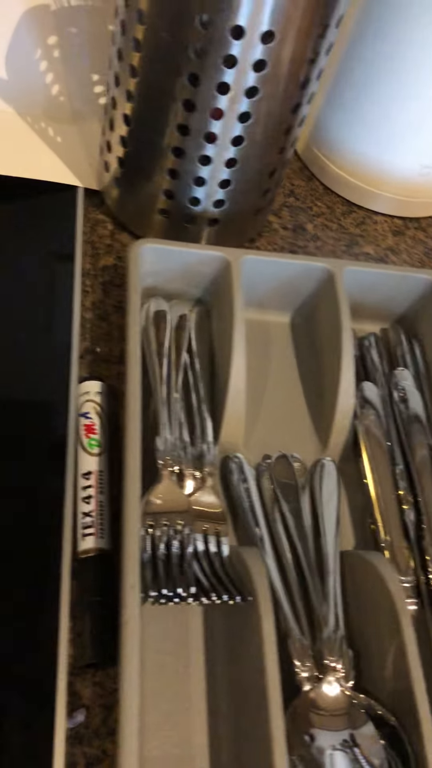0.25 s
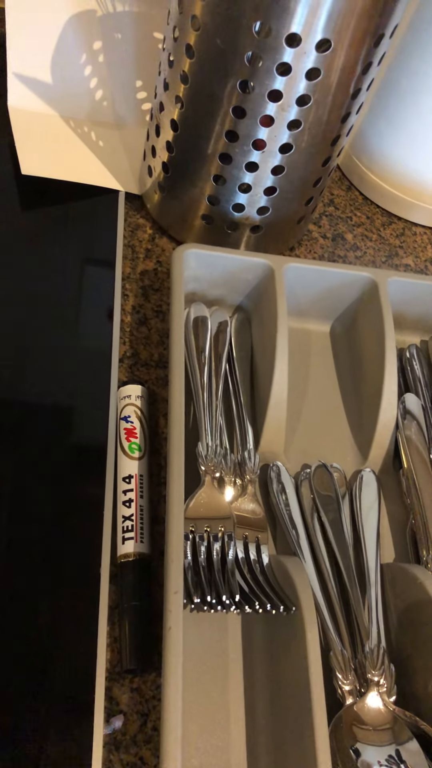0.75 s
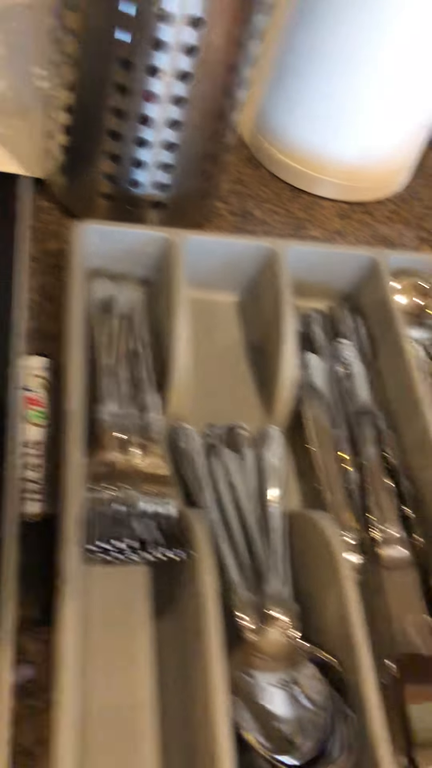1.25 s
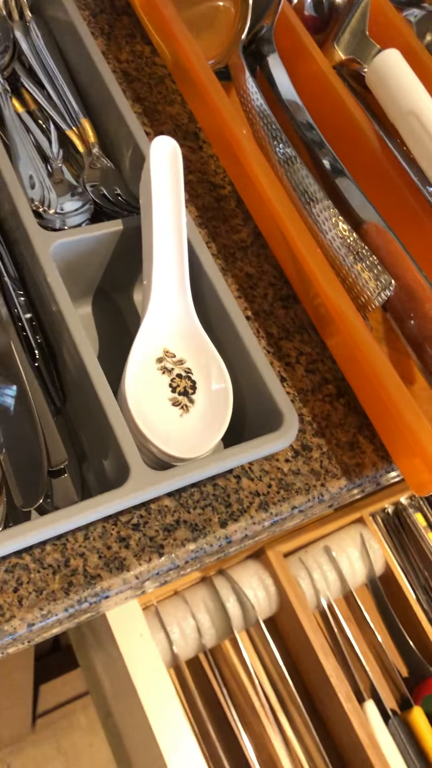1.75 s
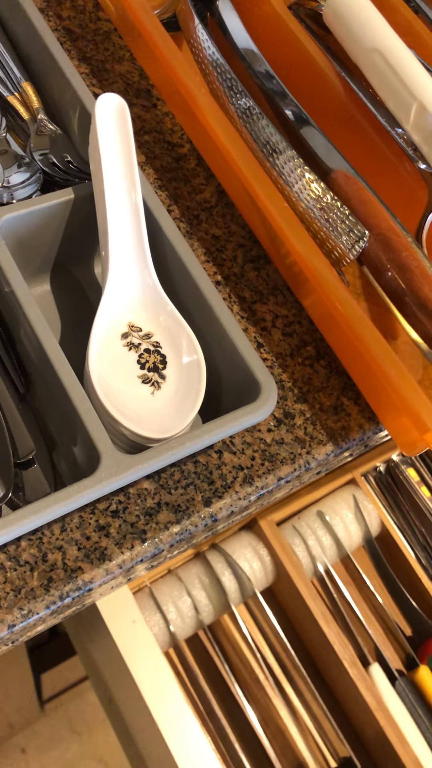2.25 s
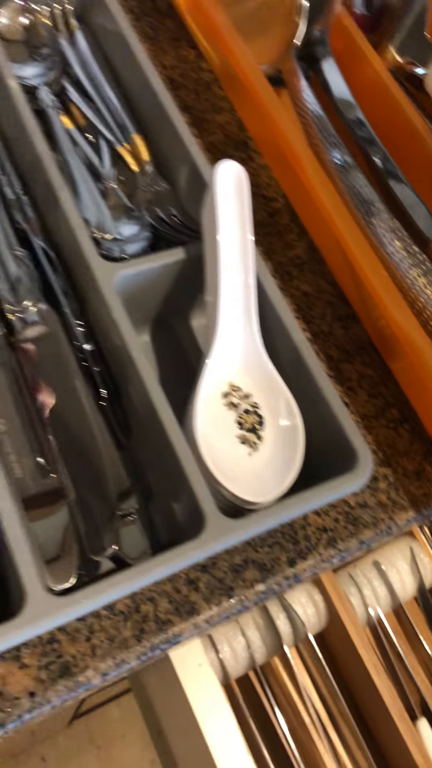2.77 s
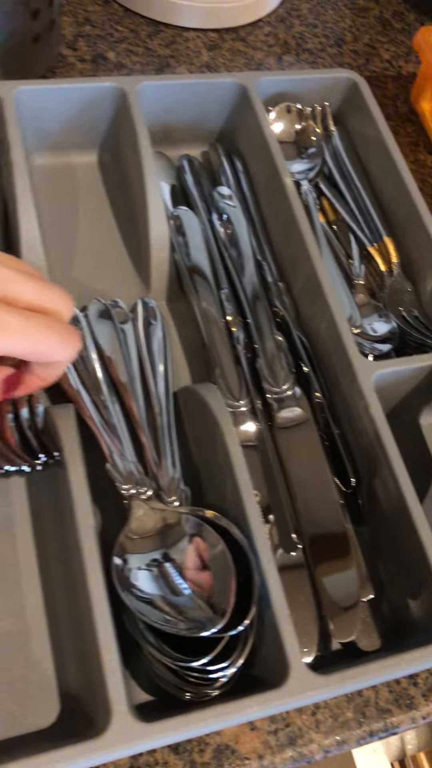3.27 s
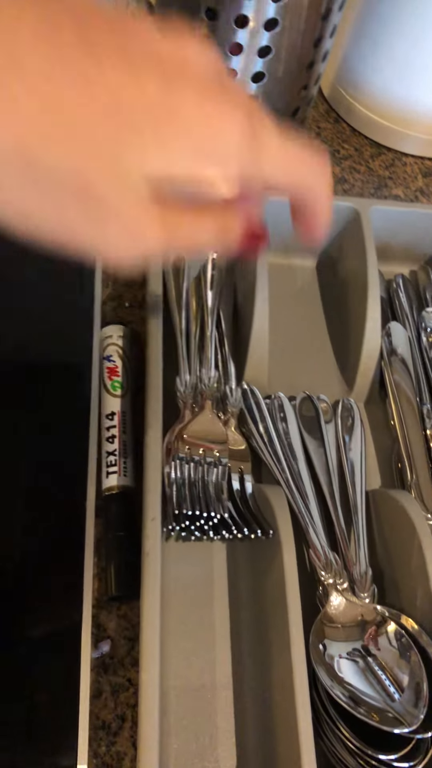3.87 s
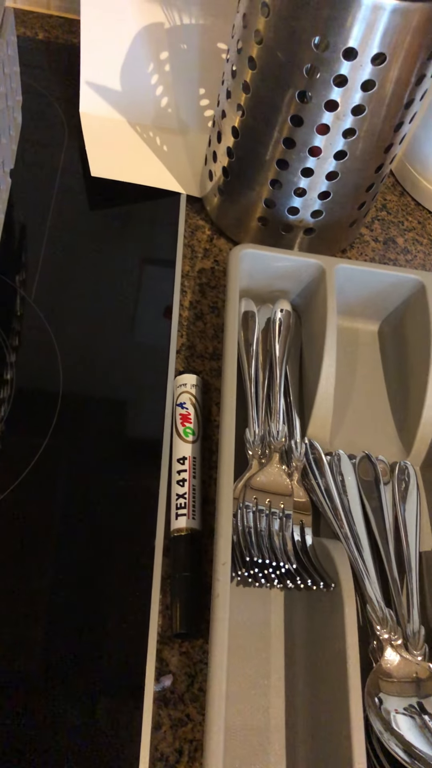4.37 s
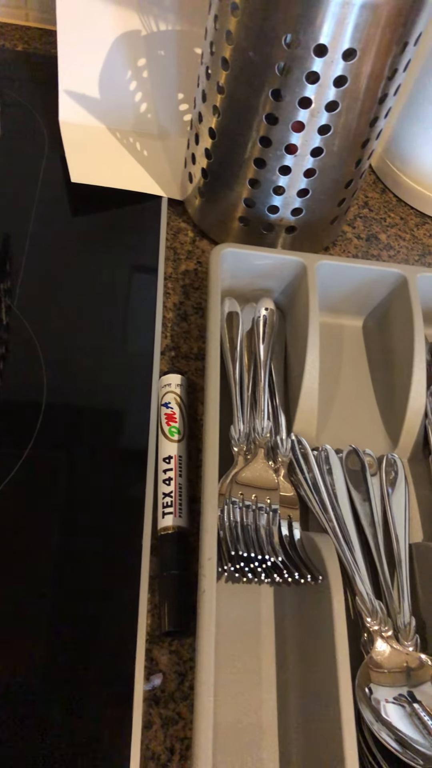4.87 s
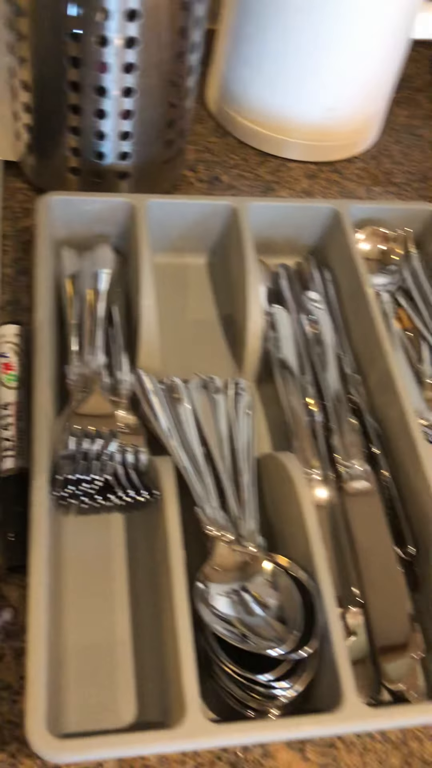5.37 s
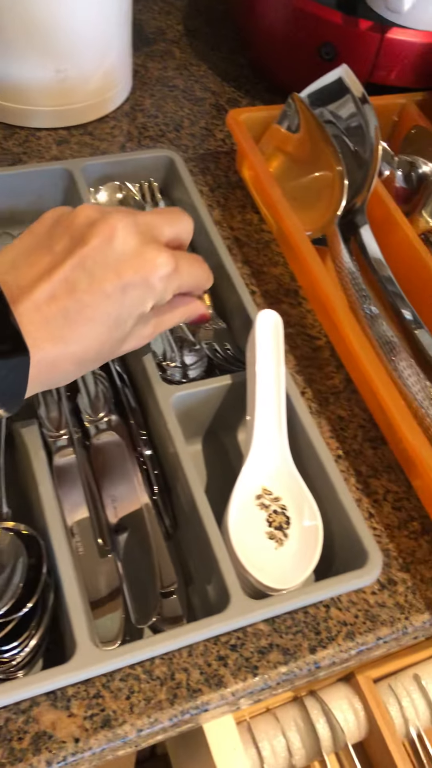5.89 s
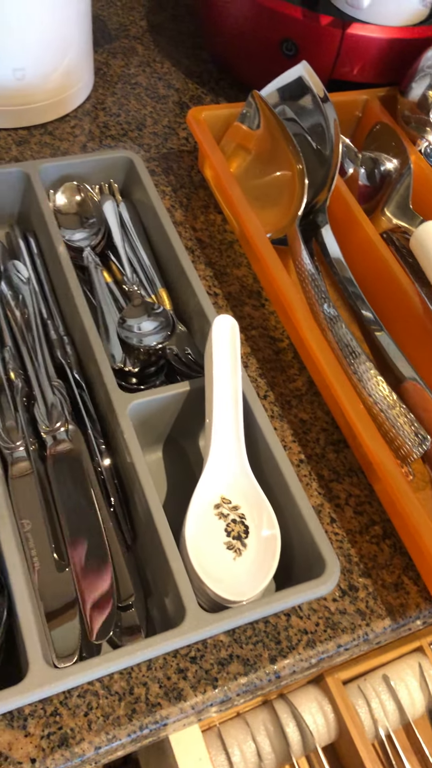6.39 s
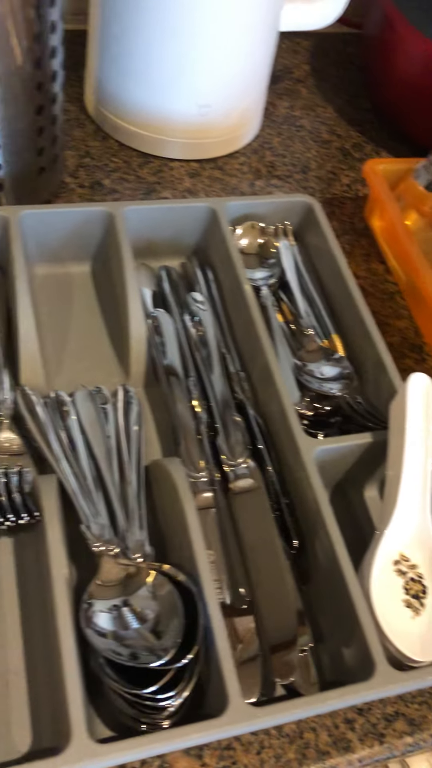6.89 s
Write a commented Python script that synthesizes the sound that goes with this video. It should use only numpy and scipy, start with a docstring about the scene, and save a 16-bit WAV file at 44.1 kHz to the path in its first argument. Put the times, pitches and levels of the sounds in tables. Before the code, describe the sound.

Forks, spoons and teaspoons are nudged and set down in a plastic tray, clinking brightly between quiet gaps over a low room hum.

```python
"""Steel cutlery is sorted on a kitchen counter with a plastic tray: forks are nudged, a handful jangles, spoons are laid down.
Each touch is a chatter of micro-impacts on damped steel modes, with a clear ting and a thud of the tray's own modes;
the main clinks settle in a soft rebound. Handles knock, the tray bumps dully and slides rustle and drone.
A small kitchen rings on behind it as a diffuse noise tail, over a low wavering appliance hum and still room air."""
import sys
import numpy as np
from scipy import signal
from scipy.fft import rfft, irfft, next_fast_len
from scipy.io import wavfile

SR = 44100
rng = np.random.default_rng(int(sys.argv[2]) if len(sys.argv) > 2 else 0)


def int16_out(signal):
    """Quantize to a 16-bit WAV file."""
    q = np.round(np.clip(np.atleast_2d(signal).T, -1, 1) * 32767)
    wavfile.write(sys.argv[1], SR, q.astype(np.int16))


N = 314768
RING = np.arange(SR * 3 // 10) / SR  # time axis in seconds of a single ringing sound

# Forks touching steel on steel in the tray. Each row: start in seconds, level in dB before the trim of the lot,
# chatter length in seconds, brightness in dB per octave, tray level in dB before its trim, clearest note in Hz.
FORK_CLINKS = [(0.475, -49, 0.003, -5, -52.5, 3680), (0.521, -44.5, .019, -7, -72, 4660),
               (0.575, -28.5, 0.015, -5.5, -46.5, 3880), (0.661, -31, 0.0056, -2.5, -69, 8930),
               (0.699, -38, .004, -3.5, -64, 3890), (0.775, -39, 0.011, -1.5, -40, 6860),
               (0.828, -39, 0.0064, -6, -45, 4130), (3.094, -45, 0.0048, 4, -92, 4040),
               (3.257, -30, .014, -.5, -51, 12200), (3.273, -34.5, 0.0056, 7, -40.5, 9450),
               (3.288, -39.5, .002, -8, -46.5, 2890), (3.477, -45, 0.0036, -1.5, -59, 11030),
               (3.616, -27.5, .011, 2, -44, 12230), (3.638, -37.5, 0.0046, -1, -51, 7800),
               (3.795, -30, 0.0086, 2.5, -44.5, 12470)]
# Strongest modes of the forks. Each row: frequency in Hz, relative level in dB, t60 in seconds.
FORK_MODES = [(2920, -8, 0.12), (3130, -6, 0.05), (3890, 1.5, 0.023), (4650, -33, 0.066), (4700, -33, 0.06),
              (5650, -0.5, 0.018), (7600, 8, 0.029), (8190, 6.5, 0.046), (9000, 4, 0.056), (9530, 9, 0.043),
              (10110, 9.5, 0.042), (10970, 11, 0.043), (11300, -2, 0.06), (11940, 9, 0.037),
              (12540, 8, 0.041), (11800, 3, 0.049), (13000, 10.5, 0.043), (13200, 15, 0.065),
              (13000, 13, 0.074), (14700, -10, 0.071), (15000, 12, 0.052), (15400, 5, 0.06)]
# Forks shifting under the fingers. Each row: start in seconds, end in seconds, typical level in dB.
FORK_STIRS = [(.45, .5, -54), (.6, .66, -46), (.72, .77, -57), (.84, .89, -53), (3.13, 3.18, -68),
              (3.36, 3.41, -61), (3.87, 3.89, -52.5)]


def nudged_forks(tray):
    """Forks are nudged against each other: damped steel under a dense chatter."""
    pile = steel(FORK_MODES, crowd_db=-5.0, crowd_t60=0.054, free_db=-38, free_t60=0.26, count=160)
    clinks = settling(FORK_CLINKS, loss_db=11.5) + ticking(FORK_STIRS, FORK_MODES)
    return cutlery(clinks, pile, tray, steel_db=0, tray_db=2.5, tray_tilt_db=0.5,
                   clicks_per_s=900, size_spread=0.027, ting_t60=0.044, note_share=0.11)


# A handful of cutlery touching steel on steel. Each row: start in seconds, level in dB, chatter length in seconds,
# brightness in dB per octave, tray level in dB before its trim, clearest note in Hz.
HANDFUL_CLINKS = [(1.033, -27.5, .002, 1.5, -61, 9300), (1.159, -47, 0.0017, -20, -73, 3580),
                  (1.244, -48.5, .003, -6, -74, 4650), (1.288, -49.5, .004, -14, -61, 4300),
                  (1.351, -38, 0.0054, 2, -72, 4910), (1.359, -23.5, .003, -2, -73, 4930),
                  (1.366, -25, .016, 0, -66, 5080), (1.397, -32, 0.0074, 1, -69.5, 9630),
                  (1.416, -36.5, 0.013, -2.5, -65, 5400), (1.454, -31.5, 0.0015, -5, -73, 6880),
                  (1.496, -33.5, 0.0051, -3, -73, 4030), (1.53, -41, 0.01, -5.5, -79, 4500),
                  (1.675, -34.5, 0.00099, -4, -71.5, 4680), (1.75, -36.5, 0.0092, 0.5, -72.5, 4700),
                  (1.78, -35.5, .011, -4.5, -78, 4690), (1.805, -38.5, 0.0084, -2, -64, 5300),
                  (1.853, -23, 0.0027, 0.5, -59, 7850), (1.894, -24, .001, -3.5, -52.5, 6410),
                  (2.071, -33, .004, -1.5, -59.5, 7770), (2.079, -27.5, 0.0042, -2.5, -59, 7900),
                  (2.123, -15.5, .003, -0.5, -49.5, 4405), (2.234, -27.5, .003, -2.5, -58, 4500),
                  (2.331, -27.5, 0.0037, -2.5, -60.5, 6100), (2.45, -16, .002, -3, -35, 12740)]
# Strongest modes of the handful. Each row: frequency in Hz, relative level in dB, t60 in seconds.
HANDFUL_MODES = [(3250, -17, 0.066), (4296, -2.5, 0.024), (4870, -5.5, 0.03), (6270, -3.5, 0.06),
                 (6590, -6, 0.047), (6824, -4.5, 0.053), (7960, -1, 0.06), (8430, -14.5, 0.053),
                 (9030, -6, 0.049), (9610, -2.5, 0.043), (10450, 1.5, 0.051), (10800, -11.5, 0.065),
                 (11800, -1.5, 0.054), (12270, 2, 0.068), (12330, 1, 0.056), (13900, -10, 0.06),
                 (14630, -4, 0.055), (14600, -8, 0.06), (15300, -5, 0.06)]
# The handful shifting under the fingers. Each row: start in seconds, end in seconds, typical level in dB.
HANDFUL_STIRS = [(1.17, 1.34, -60.5), (1.6, 1.62, -51), (2.04, 2.07, -40), (2.87, 3.0, -69.5)]


def jangling_handful(tray):
    """A handful jangles in sparse chatters, and tumbles piece over piece in denser ones."""
    pile = steel(HANDFUL_MODES, crowd_db=-1.0, crowd_t60=0.059, free_db=-43, free_t60=.28, count=200)
    clinks = settling(HANDFUL_CLINKS, loss_db=17) + ticking(HANDFUL_STIRS, HANDFUL_MODES)
    jangle = cutlery(clinks, pile, tray, steel_db=0, tray_db=-1.0, tray_tilt_db=1.0,
                     clicks_per_s=220, size_spread=.06, ting_t60=0.071, note_share=.15)
    tumble = cutlery(tumbling(), pile, tray, steel_db=0, tray_db=-1.5, tray_tilt_db=0.5,
                     clicks_per_s=450, size_spread=.075, ting_t60=0.046, note_share=.08)
    return jangle + tumble


# Level of the steel through each tumble of the handful: one list per tumble.
# Each row of a list: time in seconds, level in dB before trim and scatter.
TUMBLES = [
    [(2.13, -15), (2.158, -15), (2.168, -27.5), (2.19, -22.5), (2.205, -35.5)],
    [(2.357, -29), (2.373, -21), (2.401, -21), (2.41, -32.5)],
    [(2.46, -19.5), (2.508, -21.5), (2.552, -13), (2.598, -21.5), (2.606, -14.5), (2.652, -18.5),
     (2.675, -31)],
]
# How each tumble lands. Each row: mean brightness in dB per octave, tray in dB against the steel before its trim.
TUMBLE_LANDINGS = [(0.5, -31), (-4.5, -21.5), (0.76, -28)]
TUMBLE_GAP_S, TUMBLE_CHATTER_S, TUMBLE_TRIM_DB = .011, .01, -2.5
TUMBLE_NOTE_HZ, TUMBLE_NOTE_OCTAVES = 4400, 0.085  # centre and scatter of the notes
TUMBLE_SCATTER_DB, TUMBLE_BRIGHTNESS_SCATTER = 2.5, 1.5


def tumbling():
    """A close, uneven run of clinks through each tumble, with notes scattered round one pitch."""
    clinks = []
    for curve, (brightness, tray_db) in zip(TUMBLES, TUMBLE_LANDINGS):
        times, levels = np.transpose(curve)
        for s in np.arange(times[0], times[-1], TUMBLE_GAP_S):
            force, hardness, size = rng.uniform(-1.2, 1, 3) * np.sqrt(3)
            db = np.interp(s + TUMBLE_GAP_S / 2, times, levels) + TUMBLE_TRIM_DB + TUMBLE_SCATTER_DB * force
            start = s + TUMBLE_GAP_S * rng.uniform(-.2, .2)
            edge = brightness + TUMBLE_BRIGHTNESS_SCATTER * hardness
            note_hz = TUMBLE_NOTE_HZ * 2 ** (TUMBLE_NOTE_OCTAVES * size)
            clinks.append((start, db, TUMBLE_CHATTER_S, edge, db + tray_db, note_hz))
    return clinks


# Spoons touching steel on steel in the tray. Each row: start in seconds, level in dB before the trim of the lot,
# chatter length in seconds, brightness in dB per octave, tray level in dB, clearest note in Hz.
SPOON_CLINKS = [(4.516, -40, 0.0037, -3, -41.5, 6340), (4.534, -35.5, 0.0025, -2, -47.5, 9080),
                (4.6, -42, 0.0065, 5, -47, 11600), (4.641, -32.5, 0.0078, 0, -37.5, 15230),
                (4.684, -30.5, 0.007, -2, -46, 6520), (4.718, -15.5, 0.0069, 1, -37.5, 6360),
                (4.727, -28, .005, -2.5, -42.5, 6500), (4.833, -36, 0.0047, -5, -48.5, 5520),
                (4.867, -38, 0.0061, 3, -43.5, 12000), (4.89, -36, 0.0032, -2, -38, 5980),
                (4.953, -44, 0.01, -8, -51, 2860), (4.984, -39.5, 0.0021, -4.5, -45.5, 5060),
                (5.039, -44, 0.0027, -8, -39.5, 2660)]
# Strongest modes of the spoons. Each row: frequency in Hz, relative level in dB, t60 in seconds.
SPOON_MODES = [(2676, -14, 0.0488), (3665, -16.5, 0.037), (4880, -23, .05), (5300, -19, .05),
               (6390, -5, 0.059), (8880, -1, 0.095), (9920, -4.5, .08), (10400, -14, .06),
               (11400, -17, 0.071), (11700, -1.5, 0.082), (13700, -8, .09), (14930, -2.5, 0.074)]
# Spoons shifting under the fingers. Each row: start in seconds, end in seconds, typical level in dB.
SPOON_STIRS = [(4.55, 4.59, -55), (4.745, 4.77, -41), (4.85, 4.865, -44), (4.905, 4.93, -50),
               (5.65, 5.72, -70)]


def laid_spoons(tray):
    """Spoons are laid down: well-damped steel with a strong clear note."""
    pile = steel(SPOON_MODES, crowd_db=-4.0, crowd_t60=0.022, free_db=-50.5, free_t60=0.17, count=130)
    clinks = settling(SPOON_CLINKS, loss_db=15) + ticking(SPOON_STIRS, SPOON_MODES)
    return cutlery(clinks, pile, tray, steel_db=-1.5, tray_db=0, tray_tilt_db=-2.0,
                   clicks_per_s=770, size_spread=0.031, ting_t60=0.052, note_share=0.29)


# Teaspoons touching steel on steel in the tray. Each row: start in seconds, level in dB before the trim of the lot,
# chatter length in seconds, brightness in dB per octave, tray level in dB before its trim, clearest note in Hz.
TEASPOON_CLINKS = [(5.917, -28.5, 0.0039, -3.5, -38.5, 5450), (5.975, -22.5, .007, -1.5, -38.5, 14800),
                   (5.987, -24.5, .006, 1.5, -38, 14400), (6.107, -38, 0.0015, -4, -50, 2540),
                   (6.149, -37.5, 0.0036, -1, -48, 4400), (6.214, -27.5, 0.0015, 7, -45, 15200),
                   (6.241, -13, 0.0069, 1.5, -31, 10100), (6.251, -15.5, .026, -2, -32, 11760),
                   (6.302, -32.5, 0.002, -3, -40.5, 9000), (6.321, -22, .007, -1.5, -39.5, 8900)]
# Strongest modes of the teaspoons. Each row: frequency in Hz, relative level in dB, t60 in seconds.
TEASPOON_MODES = [(3538, -13, 0.15), (4845, -13, 0.05), (5787, -5.5, 0.088), (6240, -11, 0.059),
                  (6510, -10, 0.082), (6640, -19, .07), (8340, -18, .07), (8900, 0, 0.11), (9030, -9, .14),
                  (9400, -16.5, .08), (10130, -3.5, 0.099), (10060, -7.5, .1), (11600, -8, .1),
                  (11480, -1.5, 0.077), (11725, 3, 0.097), (12263, -12.5, 0.073), (13318, -5, .1),
                  (13840, -17, .1), (14900, -5, 0.09), (15700, -8.5, .1), (15800, -4, .1)]
# Teaspoons shifting under the fingers. Each row: start in seconds, end in seconds, typical level in dB.
TEASPOON_STIRS = [(5.93, 5.965, -42)]
LET_GO_S = 6.2


def teaspoons(tray):
    """A teaspoon is damped by the fingers, and rings freely once it is let go."""
    gripped = steel(TEASPOON_MODES, crowd_db=2, crowd_t60=0.0486, free_db=-51.5, free_t60=.15, count=150)
    free = steel(TEASPOON_MODES, crowd_db=-5.5, crowd_t60=0.047, free_db=-24.5, free_t60=0.32, count=220)
    held = settling([clink for clink in TEASPOON_CLINKS if clink[0] < LET_GO_S], loss_db=13)
    held += ticking(TEASPOON_STIRS, TEASPOON_MODES)
    dropped = settling([clink for clink in TEASPOON_CLINKS if clink[0] >= LET_GO_S], loss_db=7.5)
    out = cutlery(held, gripped, tray, steel_db=0.5, tray_db=-1.5, tray_tilt_db=6.5,
                  clicks_per_s=450, size_spread=0.11, ting_t60=0.033, note_share=0.081)
    out += cutlery(dropped, free, tray, steel_db=-0.5, tray_db=-1.0, tray_tilt_db=8.5,
                   clicks_per_s=750, size_spread=0.027, ting_t60=0.059, note_share=0.15)
    return out


def cutlery(clinks, pile, tray, steel_db, tray_db, tray_tilt_db, clicks_per_s, size_spread, ting_t60, note_share):
    """Each clink rings one piece, rattles the pile and shakes the tray under it."""
    out = np.zeros(N)
    tray_colour_db = tray_tilt_db * np.log2(np.minimum(tray[0], 1200) / 1200)
    share = np.clip(note_share, 0, 1)  # part of the steel's power in its clearest note
    for s, level_db, chatter_s, brightness, thud_db, note_hz in clinks:
        colour_db = brightness * np.log2(np.clip(pile[0], 3500, 14000) / 8000)
        rattle = touch(pile, colour_db, chatter_s, clicks_per_s, size_spread)
        sung = np.sqrt(1 - share) * rattle + np.sqrt(share) * ting(note_hz, chatter_s, ting_t60)
        thud = touch(tray, tray_colour_db, chatter_s, clicks_per_s, 0, count=1)
        add(out, s, from_db(level_db + steel_db) * sung + from_db(thud_db + tray_db) * thud)
    return out


def settling(clinks, loss_db):
    """A piece that lands rocks back once, more softly: each clink plus its rebound after the chatter."""
    rebounds = []
    for s, db, chatter_s, brightness, thud_db, hz in clinks:
        start = s + chatter_s + rng.uniform(0.0052, 0.0104)
        rebounds.append((start, db - loss_db, 0.013, brightness, thud_db - loss_db, hz))
    return list(clinks) + rebounds


TICK_GAP_S, TICK_CHATTER_S = .025, 0.0026


def ticking(stirs, modes):
    """Pieces shift under the fingers in faint clinks at uneven gaps, each on one of the pile's notes."""
    clinks = []
    for start, end, level_db in stirs:
        for s in np.arange(start, end, TICK_GAP_S):
            db = level_db + 6 * rng.standard_normal()
            note_hz = rng.choice(np.array(modes)[:, 0])
            # brightness -2.5 dB per octave, tray 22 dB under the steel before the trims
            clinks.append((s + TICK_GAP_S * rng.uniform(0, .5), db, TICK_CHATTER_S, -2.5, db - 22, note_hz))
    return clinks


def touch(thing, colour_db, chatter_s, clicks_per_s, size_spread, count=3):
    """A first impact and a chatter of others, on a few pieces that each favour other modes."""
    hz, rings = thing
    t = RING[:SR // 20]
    spots = from_db(colour_db + 3.1 * rng.standard_normal((count, len(hz))))
    spots = spots * rng.choice([-1, 1], (count, len(hz)))
    pieces = [stretch(ring, size_spread * rng.uniform(-1, 1)) for ring in spots.astype(np.float32) @ rings]
    crack = 1 + .5 * np.exp(-RING / 0.0011)  # the first millisecond of every impact stands out
    hits = rng.random((count, len(t))) < clicks_per_s / count / SR
    clicks = hits * (t < chatter_s) * from_db(-1.0 + 3.5 * rng.standard_normal(hits.shape))
    clicks[0, 0] = 1.3  # the first impact
    ringing = signal.fftconvolve(clicks, crack * np.array(pieces), axes=1).sum(axis=0)
    return unit_onset(ringing[:len(RING)], chatter_s)


def ting(hz, chatter_s, t60, count=6):
    """The clearest note of the struck piece: a beating cluster of close modes, with starts spread over the chatter."""
    cluster = hz * (1 + 0.028 * rng.uniform(-1, 1, (count, 1)))
    starts = np.arange(count)[:, None] / count * chatter_s
    age = RING - starts
    rings = (age > 0) * np.exp(-np.log(1000) * np.abs(age) / t60) * np.sin(2 * np.pi * cluster * age)
    return unit_onset(rings.sum(axis=0), chatter_s)


def stretch(ring, octaves):
    """The same ringing from a slightly larger or smaller piece."""
    length = next_fast_len(round(len(ring) * 2 ** octaves))
    return np.r_[irfft(rfft(ring), length), np.zeros(len(ring))][:len(ring)]


def unit_onset(sound, chatter_s):
    """Scale so that the chatter and the 8 ms after it have unit rms."""
    loud_part = sound[:round((max(chatter_s, 0) + .008) * SR)]
    return sound / np.sqrt(np.mean(loud_part ** 2) + 1e-20)


def body(modes, crowd, crowd_db, crowd_t60, free_db, free_t60, count):
    """Mode frequencies and their ringing: the strong modes, plus a crowd of weak ones at random pitches."""
    hz, db, t60 = np.transpose(modes)
    low, high = crowd[0][0], crowd[-1][0]
    crowd_hz = low + (high - low) * (np.arange(count) + rng.random(count)) / count
    strong, weak = from_db(db), from_db(at_hz(crowd, crowd_hz))
    gain = np.r_[strong / np.linalg.norm(strong), from_db(crowd_db) * weak / np.linalg.norm(weak)]
    hz = np.r_[hz, crowd_hz]
    weak_t60 = crowd_t60 * 2 ** rng.uniform(-1, 1, count)
    t60 = np.maximum(np.r_[t60, weak_t60], 1e-3)[:, None]
    # neighbours damp most of the motion at once; a small free part sings on
    fade = np.exp(-np.log(1000) * RING / t60) + from_db(free_db) * np.exp(-np.log(1000) * RING / free_t60)
    rings = gain[:, None] / np.sqrt(t60) * fade * np.cos(2 * np.pi * hz[:, None] * RING)
    return hz, rings.astype(np.float32)


# The crowd of weaker modes in any pile of steel. Each row: frequency in Hz, relative level in dB.
STEEL_CROWD = [(1500, -14), (2500, -12), (3400, -5.5), (4300, -1.5), (6000, 2.5), (9000, 0), (12500, 2.5),
               (16000, 6)]


def steel(modes, **ringing):
    """A pile of cutlery: its own strong modes over the crowd common to all the steel."""
    return body(modes, STEEL_CROWD, **ringing)


# Strongest modes of the plastic tray. Each row: frequency in Hz, relative level in dB, t60 in seconds.
TRAY_MODES = [(165, -13, 0.062), (224, -7, 0.16), (306, -5.5, .07), (459.5, 2, 0.027), (584, -9, 0.076),
              (757, -5, 0.13), (935, -2.5, 0.048), (1150, -1, 0.043), (1264, -3.5, 0.06),
              (1500, -3.5, 0.021), (1744, -10, 0.021), (2318, -1, 0.016)]
# The crowd of weaker modes in the tray. Each row: frequency in Hz, relative level in dB.
TRAY_CROWD = [(100, 1), (300, -9), (600, -1.5), (1200, -0.5), (2000, -3), (3500, -6), (6000, -17.5)]


def plastic_tray(**ringing):
    """The tray on the counter: a few strong low modes and a crowd of weaker ones."""
    return body(TRAY_MODES, TRAY_CROWD, count=130, **ringing)


# Handles knocking on the plastic. Each row: start in seconds, level in dB before the trim,
# chatter length in seconds, centre frequency in Hz.
KNOCKS = [(0.57, -37, 0.0028, 970), (0.573, -37, 0.013, 457), (0.775, -33, 0.0027, 1070),
          (0.79, -43.5, 0.019, 900), (0.82, -41.5, 0.0069, 1080), (2.314, -43, 0.0021, 2004),
          (2.518, -21.5, .005, 1234), (2.573, -35, .004, 1078), (2.63, -37.5, 0.0025, 1203),
          (3.466, -51, 0.0022, 2540), (3.515, -35, 0.0018, 1080), (4.513, -46, 0.0021, 1440),
          (4.637, -35, 0.0042, 1180), (4.686, -39.5, 0.019, 1100), (4.854, -40.5, 0.0068, 460),
          (4.878, -40.5, .003, 1180), (5.039, -37, .0023, 1168), (5.046, -51, 0.0033, 437),
          (5.975, -33.5, 0.0046, 1490), (6.106, -31, 0.003, 1327), (6.241, -24.5, .005, 1290)]


def knocks(gain_db, focus_db):
    """A handle on plastic favours the tray modes round one pitch, set by where it lands."""
    # a handle that is pressed on the plastic damps it
    pressed = plastic_tray(crowd_db=1, crowd_t60=.02, free_db=-50, free_t60=.15)
    out = np.zeros(N)
    for s, level_db, chatter_s, centre_hz in KNOCKS + jostling():
        colour_db = -focus_db * np.minimum(np.abs(np.log2(pressed[0] / centre_hz)), 2.2)
        knock = touch(pressed, colour_db, chatter_s, clicks_per_s=690, size_spread=0)
        add(out, s, from_db(level_db + gain_db) * knock)
    return out


# Handles jostling against the tray walls. Each row: start in seconds, end in seconds,
# level in dB before scatter and trim, centre frequency in Hz.
JOSTLES = [(0.365, .45, -56.5, 750), (0.841, .88, -46.5, 890), (4.491, 4.51, -51, 2200),
           (4.656, 4.71, -43.5, 1390), (4.934, 4.975, -45, 1500), (5.012, 5.035, -60, 2200)]


def jostling():
    """Small knocks at uneven gaps and strengths."""
    small_knocks = []
    for start, end, db, hz in JOSTLES:
        for s in np.arange(start, end, TICK_GAP_S):
            late_s = TICK_GAP_S * rng.uniform(0, 0.46)
            small_knocks.append((s + late_s, db + rng.uniform(-7.2, 6), TICK_CHATTER_S, hz))
    return small_knocks


# Dull bumps of the tray on the counter. Each row: start in seconds, peak of the envelope in dB, frequency in Hz.
BUMPS = [(2.152, -47.5, 127.3), (2.379, -54, 150), (2.516, -49, 125), (2.635, -46.5, 116.7),
         (3.635, -54, 139), (4.7, -50, 71.8), (5.039, -61, 119), (5.64, -55.5, 122.2)]


def bumps(swell_s):
    """Soft, low thuds: sines that swell to a peak and fade."""
    out = np.zeros(N)
    swell = RING / swell_s * np.exp(1 - RING / swell_s)
    for s, peak_db, hz in BUMPS:
        add(out, s, from_db(peak_db) * swell * np.sin(2 * np.pi * hz * RING))
    return out


# A hand or a pile sliding over the plastic. Each row: time of the peak in seconds, rustle level in dB before the trim,
# half-length in seconds, drone frequency in Hz, drone level in dB.
SLIDES = [(0.238, -64.5, 0.18, 220.5, -57), (0.54, -53, 0.12, 218, -51.5), (0.604, -44.5, 0.059, 464, -53),
          (0.837, -45.5, 0.087, 455, -55.5), (1.892, -60, 0.25, 323, -61), (2.427, -55, .25, 320, -72),
          (3.606, -61.5, 0.4, 711, -67), (4.668, -45.5, 0.1, 233, -49.5), (4.881, -53.5, 0.056, 710, -50),
          (5.013, -52, 0.096, 244.4, -62.5)]
# Colour of the rustle. Each row: frequency in Hz, relative density in dB per Hz.
RUSTLE_COLOUR = [(60, -4.5), (130, -5.5), (240, 1), (400, -4.5), (600, -2.5), (1000, -10), (1500, -13.5),
                 (2500, -21), (6000, -21.5), (15000, -31)]
HANDLING_DB = -66  # rustle that goes on between slides, before the trim


def rustle(trim_db):
    """Moving hands rustle as coloured noise that flutters, and swells and fades with each slide."""
    t = np.arange(N) / SR
    power = from_db(HANDLING_DB) ** 2
    for s, db, half_s, _, _ in SLIDES:
        power = power + from_db(db) ** 2 * np.exp(-2 * ((t - s) / half_s) ** 2)
    return np.sqrt(power) * from_db(trim_db + 1.5 * drift(30)) * noise(RUSTLE_COLOUR)


def drones():
    """Rubbing excites one narrow resonance for as long as each slide lasts."""
    out = np.zeros(N)
    for s, _, half_s, hz, db in SLIDES:
        start = max(s - 2 * half_s, 0)
        t = np.arange(start, s + 2 * half_s, 1 / SR)
        add(out, start, from_db(db) * np.exp(-((t - s) / half_s) ** 2) * wavering(hz, t - start))
    return out


def wavering(hz, t, count=100):
    """Narrow noise round one pitch, of roughly unit rms: two quadrature tones with wandering strengths."""
    knots_per_s = 32
    a, b = (np.interp(t * knots_per_s, np.arange(count), knots) for knots in rng.standard_normal((2, count)))
    return a * np.cos(2 * np.pi * hz * t) + b * np.sin(2 * np.pi * hz * t)


# Kitchen reverberation time. Each row: frequency in Hz, t60 in seconds.
ROOM_T60 = [(150, 0.82), (600, 0.61), (1400, 0.6348), (4000, 0.6456), (9000, 0.4964), (15000, 0.42)]
# Kitchen reverberation colour. Each row: frequency in Hz, relative level in dB.
ROOM_COLOUR = [(150, -0.5), (600, 2.5), (1400, 4.5), (4000, -3), (9000, -3), (15000, -4.5)]


def kitchen(x, wet_db, first_echo_s):
    """Diffuse echoes from walls and cupboards: noise bands that broadly die sooner in the treble."""
    t = np.arange(SR) / SR
    edges = np.geomspace(80, 17000, 13)
    tail = np.zeros(SR)
    for low, high in zip(edges, edges[1:]):
        hz = np.sqrt(low * high)
        bandpass = signal.butter(2, [low, high], "band", fs=SR, output="sos")
        band = signal.sosfilt(bandpass, rng.standard_normal(SR))
        tail += band * from_db(at_hz(ROOM_COLOUR, hz) - 60 * t / at_hz(ROOM_T60, hz))
    tail *= np.clip(t / first_echo_s - 1, 0, 1)  # silent up to the first echo, then fading in
    return from_db(wet_db) * signal.fftconvolve(x, tail / np.linalg.norm(tail))[:N]


# Appliance hum in the kitchen. Each row: frequency in Hz, level in dB, waver as a share of the tone.
HUM = [(83.7, -61, 0.29), (228, -74, 0.42), (368.6, -68.5, 0.24)]


def appliance_hum():
    """Low steady tones, each wavering in strength and phase."""
    t = np.arange(N) / SR
    out = np.zeros(N)
    for hz, db, waver in HUM:
        wander = 1 + waver * (drift(12) + 1j * drift(16))
        out += from_db(db) * np.sqrt(2) * np.real(wander * np.exp(2j * np.pi * hz * t))
    return out


# Still air of the room. Each row: frequency in Hz, relative density in dB per Hz.
AIR = [(15, -55), (25, -19.5), (53, -15), (64, -8), (87, 2.5), (137, -13.5), (217, -17), (335, -15.5),
       (363, -15), (476, -31.5), (624, -23.5), (1440, -34), (2000, -52.5), (3620, -46), (16000, -54.5)]


def room_air(rms_db):
    """Steady coloured noise, heaviest in the bass."""
    return from_db(rms_db) * noise(AIR)


def noise(spectrum):
    """Steady coloured noise of unit rms."""
    hz = np.arange(N // 2 + 1) * SR / N
    return rms_one(irfft(rfft(rng.standard_normal(N)) * from_db(at_hz(spectrum, hz)), N))


def drift(rate):
    """Slow random wander of spread just under 1, through `rate` random points per second."""
    knots = rng.standard_normal(1000)
    return np.interp(np.arange(N) / SR * rate, np.arange(len(knots)), knots)


def from_db(db):
    """Decibels to gain."""
    return 10 ** (np.asarray(db) / 20)


def rms_one(x):
    """Scale to unit rms."""
    return x / np.sqrt(np.mean(x ** 2) + 1e-20)


def at_hz(points, hz):
    """Read a table on a log-frequency axis."""
    f, value = np.transpose(points)
    return np.interp(np.log(np.maximum(hz, 1)), np.log(f), value)


def add(track, s, sound):
    """Mix a sound into a track at time s."""
    i = max(round(s * SR), 0)
    track[i:i + len(sound)] += sound[:N - i]


def scene():
    """Four lots of cutlery and the tray, in the kitchen."""
    tray = plastic_tray(crowd_db=0.5, crowd_t60=0.05, free_db=-37.5, free_t60=0.35)
    dry = nudged_forks(tray) + jangling_handful(tray) + laid_spoons(tray) + teaspoons(tray)
    dry += knocks(gain_db=-1.5, focus_db=13.5) + bumps(swell_s=0.03)
    echoes = kitchen(dry, wet_db=-14.5, first_echo_s=0.0034)
    background = rustle(trim_db=-1.5) + drones() + appliance_hum() + room_air(rms_db=-61.5)
    return (dry + echoes + background)[None]


def record(dry):
    """The deepest bass falls away, peaks are rounded and the top is cut."""
    thinned = signal.sosfilt(signal.butter(2, 35, "high", fs=SR, output="sos"), dry)
    rounded = 0.71 * np.tanh(thinned / 0.73)
    return signal.sosfilt(signal.ellip(12, .1, 80, 15850, fs=SR, output="sos"), rounded)


dry = scene()
out = record(dry)
int16_out(out)
```